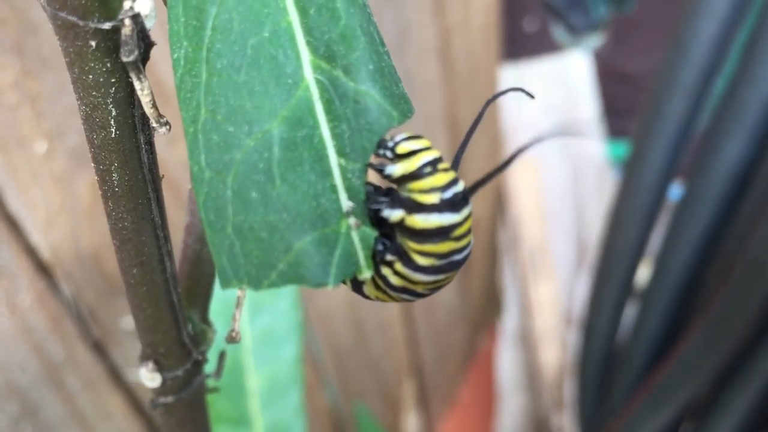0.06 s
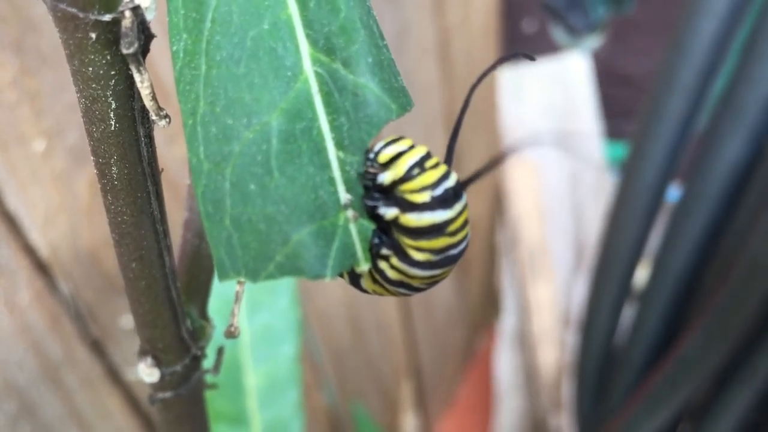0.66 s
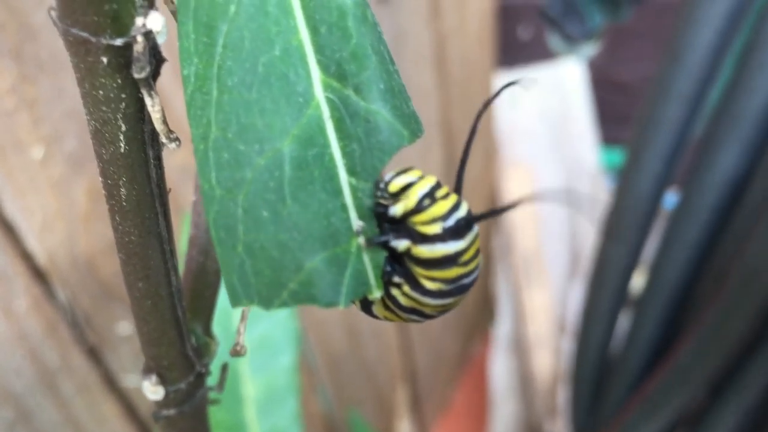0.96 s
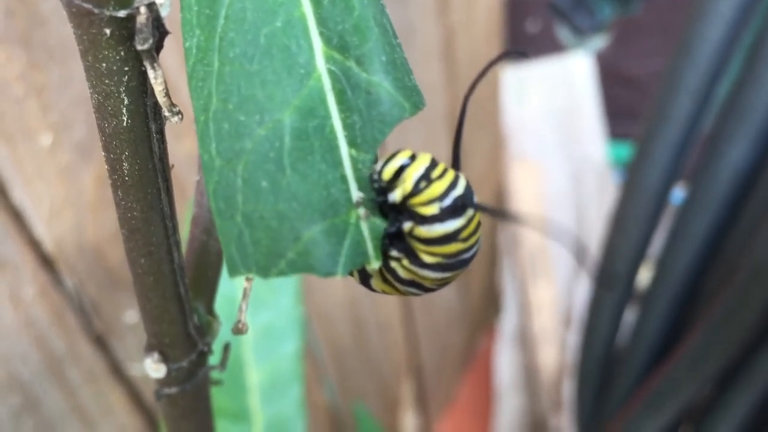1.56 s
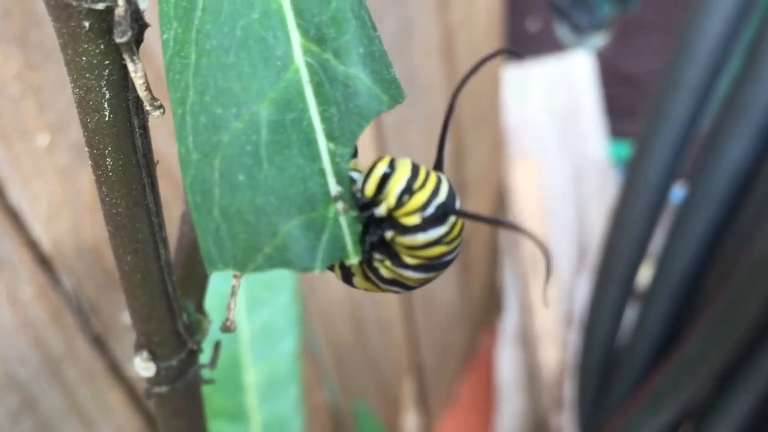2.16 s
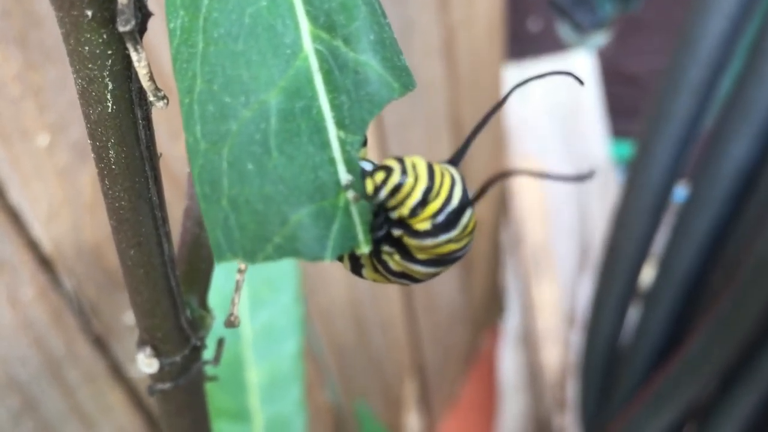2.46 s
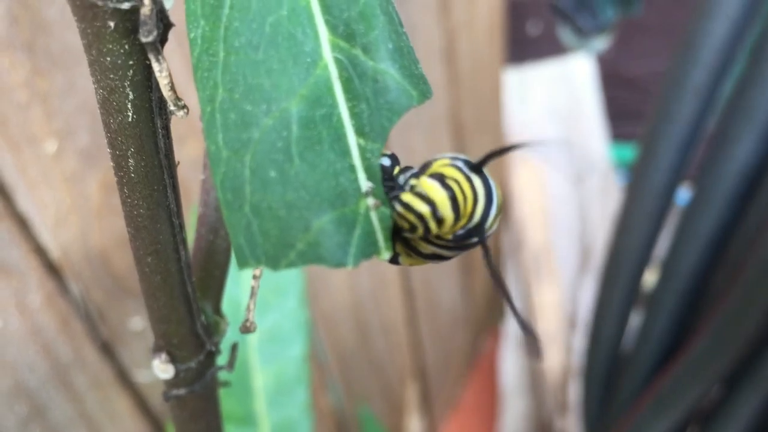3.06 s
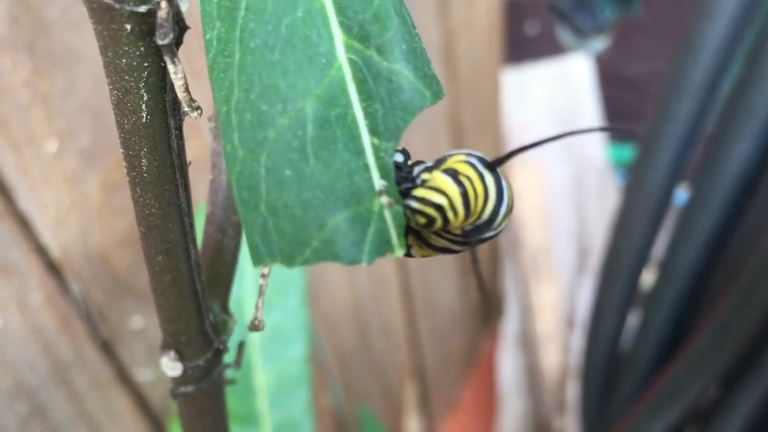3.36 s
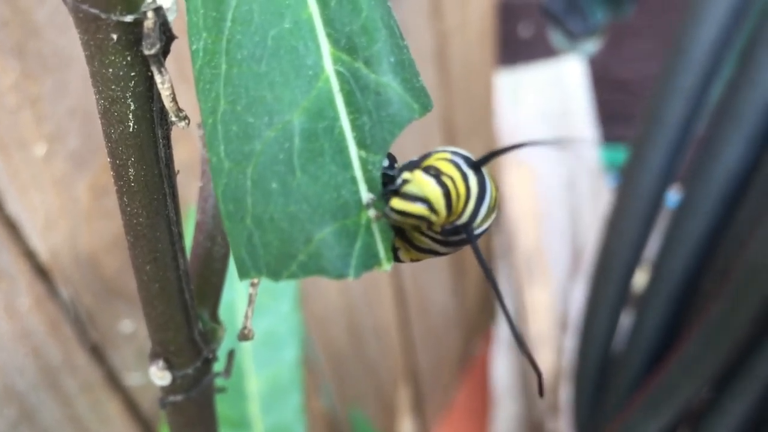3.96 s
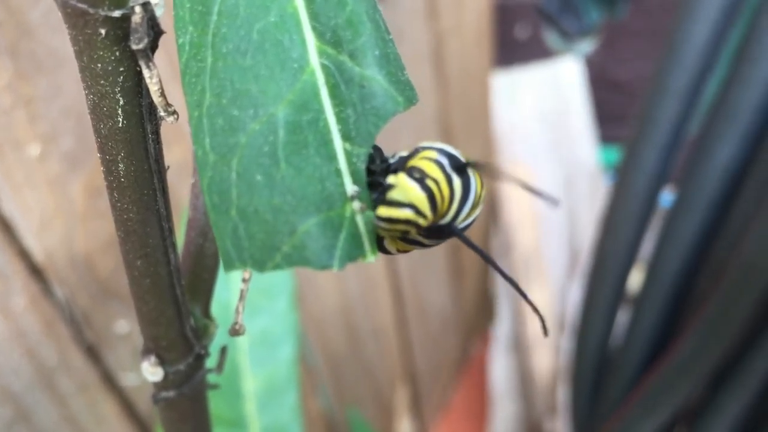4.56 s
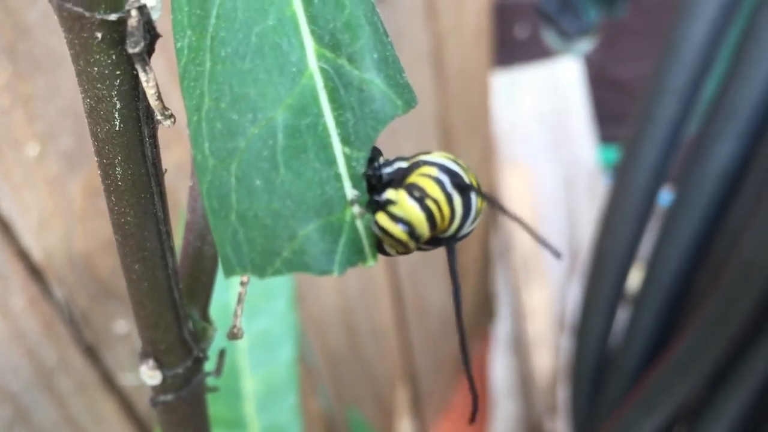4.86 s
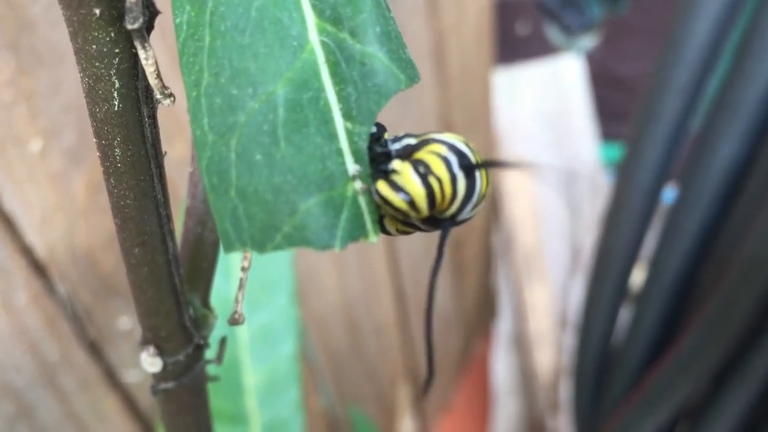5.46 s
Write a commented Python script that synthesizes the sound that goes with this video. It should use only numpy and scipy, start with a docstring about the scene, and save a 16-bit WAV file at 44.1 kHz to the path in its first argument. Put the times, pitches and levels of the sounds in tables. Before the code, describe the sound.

Distant traffic and a machine hum outdoors, with faint steady ticking, a tiny leaf crunch and one soft bump on the microphone.

```python
"""A back yard, a phone microphone held close to a caterpillar feeding on a leaf. From the start, far traffic
and an outdoor machine's hum lie behind tiny clock-steady ticks, most likely the phone's electronics.
About a second in, leaf fibres snap in a faint crunch and a few soft scuffs follow. Near 2.5 s the phone
takes one soft bump and the hand steadies it. Meanwhile a distant car pulls away, its exhaust rising
with the revs, and changes gear near 5 s."""
import sys
import numpy as np
from scipy import signal
from scipy.fft import rfft, irfft
from scipy.io import wavfile

SR = 44100
rng = np.random.default_rng(int(sys.argv[2]) if len(sys.argv) > 2 else 0)


def put_to_file(sound):
    """Save the sound as 16-bit audio at rate SR, in the file named by the first command-line argument."""
    columns = np.atleast_2d(sound).T  # one column per channel
    safe = np.clip(columns, -1, 1)
    whole_steps = np.round(safe * 32767)
    wavfile.write(sys.argv[1], SR, whole_steps.astype(np.int16))


N = 247842
TIME = np.arange(N) / SR


def snap(at_s, peak_db, hz, t60_s=.0067, width_hz=3800):
    """One leaf fibre gives way in a burst of a few milliseconds."""
    age = TIME[:SR // 20]
    burst = rng.standard_normal(len(age)) * np.exp(-np.log(1000) * age / t60_s)
    burst = band(burst, hz, width_hz)
    out, start = np.zeros(N), round(at_s * SR)
    out[start:start + len(age)] = from_db(peak_db) * burst / np.abs(burst).max()
    return out


def crunch(bite_s=.9708, peak_db=-49, bite_hz=8600, fibre_hz=5800, gap_s=.0026, loss_db=2):
    """The bite, close up: one fibre cracks, the leaf breaks brightly, and six more follow in a dying run."""
    out = snap(bite_s - .0108, peak_db - 6, fibre_hz) + snap(bite_s, peak_db, bite_hz)
    for k, (late, pitch) in enumerate(rng.uniform(-.82, 1, (6, 2))):
        at_s = bite_s + gap_s * (k + 1 + .3 * late)
        out += snap(at_s, peak_db - loss_db * k, fibre_hz * 2 ** (.2 * pitch))
    return out


# Rubs of leaf and stem, close to the microphone; levels are rms at the top of each swell:
# (time [s], body level [dB], body centre [Hz], body width [Hz], half length [s], rasp level [dB])
LEAF_RUBS = [(.979, -57.5, 2150, 900, .014, -66), (1.408, -47.5, 1660, 360, .018, -64),
             (2.526, -62, 2620, 400, .012, -80), (2.817, -61.5, 2860, 380, .017, -67.5)]

def scuffs(grain_db=2, rasp_hz=3900, rasp_width_hz=1300):
    """Short grainy rubs swell and fade, each with a body of its own pitch and a higher rasp."""
    out, grain = np.zeros(N), from_db(grain_db * drift(250))
    for at_s, body_db, hz, width_hz, half_s, rasp_db in LEAF_RUBS:
        rub = rng.standard_normal(N) * grain
        body = from_db(body_db) * rms_one(band(rub, hz, width_hz))
        rasp = from_db(rasp_db) * rms_one(band(rub, rasp_hz, rasp_width_hz))
        out += (body + rasp) * swell(at_s, half_s)
    return out


# The tapped case of the phone, heard by its own microphone: (frequency [Hz], relative level [dB])
CASE_SPECTRUM = [(300, -15), (900, 3), (1400, 3.5), (2100, -12.5), (2900, -7), (3300, -19), (3800, -19),
                 (4400, -38), (6000, -29), (10000, -52)]

def bump(at_s=2.4472, low_hz=62, glide_hz=370, glide_s=.0024, rise_s=.0014, length_s=.032, ring_t60_s=.066):
    """A light tap rings briefly in the phone's case, with a thud whose pitch sinks at once into the bass."""
    age = np.maximum(TIME - at_s, 0)
    cycles = low_hz * age + glide_hz * glide_s * (1 - np.exp(-age / glide_s))
    envelope = (1 - np.exp(-age / rise_s)) * np.exp(-(age / length_s) ** 4)
    thud = np.sin(2 * np.pi * cycles) * envelope
    touch = signal.unit_impulse(N, round((at_s - .00091) * SR))   # just ahead of the thud
    tap = colour(touch, CASE_SPECTRUM)
    ring = noise(CASE_SPECTRUM) * (age > 0) * np.exp(-np.log(1000) * age / ring_t60_s)
    return from_db(-17.5) * thud + from_db(-27) * tap / np.abs(tap).max() + from_db(-52) * ring


def handling(level_db=-41):
    """A faint low shudder as the hand steadies the phone after the bump."""
    shake = band(rng.standard_normal(N), hz=58, width_hz=25)
    return from_db(level_db) * rms_one(shake) * swell(at_s=2.7, half_s=.14)


# The thin, bright colour of the ticks at the microphone: (frequency [Hz], relative level [dB])
TICK_SPECTRUM = [(1500, -13.5), (3000, -8), (4200, -17), (4750, 0.5), (5250, 3.5), (5700, -2.5),
                 (6300, 2.5), (7100, -6), (7700, -5), (9600, -14), (10400, -29), (12000, -11), (14300, -24),
                 (15300, -18.5)]
# The ticks grow a little weaker midway: (time [s], relative level [dB])
TICK_TREND = [(0, -0.5), (1, 1), (2.1, -0.7), (3.3, -1), (4.3, 0.8), (5.62, -0.5)]

def ticks(fast_period_s=.1024, slow_period_s=.3, fast_db=-50.5, slow_db=-47, busy_s=.057, early_s=.005):
    """Two steady clocks of sharp impulses; the fast one makes way for the slow one, giving close pairs."""
    slow = np.arange(.228, TIME[-1], slow_period_s)
    fast = np.arange(.0318, TIME[-1], fast_period_s)
    # a fast tick due within busy_s after a slow one comes just ahead of it instead, 2 dB stronger
    since_slow = (fast - slow[0] + early_s) % slow_period_s - early_s
    paired = since_slow < busy_s
    fast = np.where(paired, fast - since_slow - early_s, fast)
    clicks = np.zeros(N)
    for times, db in ((fast, fast_db + 2 * paired), (slow, slow_db)):
        spread_db = .8 * rng.standard_normal(len(times))
        clicks[np.round(times * SR).astype(int)] = from_db(db + spread_db)
    unit_peak = np.abs(colour(signal.unit_impulse(N), TICK_SPECTRUM)).max()
    return colour(clicks * from_db(in_time(TICK_TREND)), TICK_SPECTRUM) / unit_peak


# Engine speed of the car, far from the yard: (time [s], engine cycle rate [Hz])
ENGINE_SPEED = [(0, 15), (1.6, 16.3), (2.6, 18.5), (3.1, 22.5), (3.6, 25.2), (4.05, 28.7), (4.6, 32.5),
                (4.74, 31.2), (4.95, 26), (5.17, 28.4), (5.62, 29.3)]
# Its tones: (multiple of the cycle rate [-], level in lower gear [dB], level in higher gear [dB])
ORDER_BALANCE = [(2, -16, -9), (2.5, -10.5, 1), (3, 0.5, -2), (3.5, -12.5, -1), (4, -2, -4.5),
                 (5, -10, -2.5), (6, 0, -3), (7, -7.5, -6.5), (8, -13, 1.5), (10, -6, -15)]
# Resonances of its exhaust pipe: (frequency [Hz], gain [dB])
EXHAUST_PIPE = [(35, -19), (55, -5.5), (75, -4.5), (92, -0.5), (125, -2.5), (145, -6.5), (175, -0.5),
                (195, -6.5), (215, -8), (238, -5.5), (265, -8), (310, -9), (400, -19)]

def car(cruise_hz=14.9, cruise_db=-52.3, db_per_octave=13.5, ease_s=4.72, ease_db=4.8, gear_change_s=4.95):
    """Engine orders sweep through the exhaust resonances over a rough roar; both grow with the revs."""
    revs = in_time(ENGINE_SPEED)
    phase = 2 * np.pi * np.cumsum(revs * (1 + .0085 * drift(12.14))) / SR
    eased = .5 + .5 * np.tanh((TIME - ease_s) / .2)   # the driver eases off
    shifted = .5 + .5 * np.tanh((TIME - gear_change_s) / .096)   # the new load favours other orders
    level_db = cruise_db + db_per_octave * np.log2(revs / cruise_hz) - ease_db * eased
    out = from_db(level_db - 2.5) * rumble()
    for multiple, low_gear_db, high_gear_db in ORDER_BALANCE:
        order_db = low_gear_db + shifted * (high_gear_db - low_gear_db)
        pipe_db = at_hz(EXHAUST_PIPE, multiple * revs)
        flutter_db = 3 * drift(7.7)
        out += tone(multiple * phase + 2 * np.pi * rng.random(), level_db + order_db + pipe_db + flutter_db)
    return out


# An outdoor machine in the background: (frequency [Hz], rms level [dB])
MACHINE_TONES = [(120, -47.2), (346.8, -54), (405.9, -62), (567.6, -59), (693.8, -60.5)]

def machine_hum(waver_db=1.6, wander_rad=.22):
    """A running machine holds steady tones that waver a little in level and phase."""
    out = np.zeros(N)
    for hz, db in MACHINE_TONES:
        level_db = db + waver_db * drift(3.6)
        phase = 2 * np.pi * (hz * TIME + rng.random()) + wander_rad * drift(3.7)
        out += tone(phase, level_db)
    return out


# The low end of far vehicles as it reaches the yard: (frequency [Hz], relative level [dB])
RUMBLE_SPECTRUM = [(15, -58), (32, -14), (45, -4.5), (60, -1.5), (85, 6), (105, 2.5), (140, -3.5),
                   (200, -2), (235, -1), (280, -5.5), (340, -7.5), (450, -43.5), (2000, -80.5)]

def rumble():
    """The low, rough noise of distant vehicles, at unit rms."""
    return noise(RUMBLE_SPECTRUM)


# The roar of tyres from far off: (frequency [Hz], relative level [dB])
TYRE_SPECTRUM = [(200, -13.5), (320, -7), (370, -3), (430, 2.5), (510, -3.5), (640, 2.5), (780, 0),
                 (850, -2), (1020, 4), (1150, 0.5), (1300, -7.5), (1550, -7.5), (1800, -16.5),
                 (2100, -23.5), (3000, -38), (8000, -73.5)]
# Far vehicles going by: (time [s], half length [s], top rms level [dB], centre [Hz], width [Hz])
PASSING_VEHICLES = [(1.16, 0.35, -46.5, 920, 260), (2.4, .3, -51, 1000, 300),
                    (3.514, 0.44, -48.3, 1430, 650)]

def traffic(rumble_db=-46, tyres_db=-46, waver_db=.5):
    """Steady rumble and tyre roar, out of which single vehicles swell and fade."""
    out = from_db(rumble_db) * rumble()
    out += from_db(tyres_db + waver_db * drift(1.9)) * noise(TYRE_SPECTRUM)
    for at_s, half_s, db, hz, width_hz in PASSING_VEHICLES:
        tyres = rms_one(resonance(noise(TYRE_SPECTRUM), hz, width_hz))
        out += from_db(db) * tyres * swell(at_s, half_s)
    return out


# The noise floor of the phone's microphone: (frequency [Hz], relative level [dB])
HISS_SPECTRUM = [(1500, 1), (3000, 0), (4600, -2), (5400, -0.5), (6400, -1.5), (7200, -8), (8600, -5.5),
                 (9700, -8), (10400, -13.5), (11600, -10), (13500, -12), (15800, -13)]

def microphone_hiss(hiss_db=-70, whine_hz=4040, whine_db=-90):
    """The microphone's steady hiss, with a thin, very faint whine in it."""
    return from_db(hiss_db) * noise(HISS_SPECTRUM) + tone(2 * np.pi * whine_hz * TIME, whine_db)


def from_db(db):
    """Decibels to gain."""
    return 10 ** (np.asarray(db) / 20)


def rms_one(x):
    """Scale to unit rms."""
    return x / np.sqrt(np.mean(x ** 2) + 1e-20)


def tone(phase, rms_db):
    """A sine of the given phase and rms level."""
    return np.sqrt(2) * from_db(rms_db) * np.sin(phase)


def swell(at_s, half_s):
    """A bell-shaped rise and fall around a moment."""
    return np.exp(-((TIME - at_s) / half_s) ** 2)


def in_time(curve):
    """Read a (time, value) curve at every sample."""
    return np.interp(TIME, *np.transpose(curve))


def at_hz(spectrum, hz):
    """Read a spectrum's decibels on a log-frequency axis."""
    known_hz, db = np.transpose(spectrum)
    return np.interp(np.log(np.maximum(hz, 1)), np.log(known_hz), db)


def colour(x, spectrum, size=2 ** 18):
    """Causal (minimum-phase) filter with the given spectrum."""
    bin_hz = np.arange(size // 2 + 1) * SR / size
    cepstrum = irfft(np.log(from_db(at_hz(spectrum, bin_hz))))
    cepstrum[1:size // 2] *= 2
    cepstrum[size // 2 + 1:] = 0
    return irfft(rfft(x, size) * np.exp(rfft(cepstrum)))[:N]


def noise(spectrum):
    """Coloured noise of unit rms."""
    return rms_one(colour(rng.standard_normal(N), spectrum))


def drift(rate_hz, step=40, settle=2000):
    """A smooth random wander of unit rms, mostly slower than rate_hz."""
    pole = np.exp(-2 * np.pi * rate_hz * step / SR)
    white = rng.standard_normal(N // step + settle + 2)
    slow = signal.lfilter([1], [1, -2 * pole, pole ** 2], white)[settle:]
    return np.interp(np.arange(N) / step, np.arange(len(slow)), rms_one(slow))


def resonance(x, hz, width_hz):
    """Two-pole resonance with gain 1 at its peak."""
    radius = np.exp(-np.pi * width_hz / SR)
    feedforward = np.array([1, 0, -1]) * (1 - radius ** 2) / 2
    feedback = [1, -2 * radius * np.cos(2 * np.pi * hz / SR), radius ** 2]
    return signal.lfilter(feedforward, feedback, x + 1e-18)


def band(x, hz, width_hz):
    """The same resonance twice, for steeper sides."""
    return resonance(resonance(x, hz, width_hz), hz, width_hz)


def scene():
    """Small sounds at the microphone over the far background of the yard, in mono."""
    close = ticks() + crunch() + scuffs() + bump() + handling()
    far = car() + machine_hum() + traffic()
    return (close + far + microphone_hiss())[None]


def record(dry, cutoff_hz=15750):
    """The top of the treble is cut steeply."""
    return signal.sosfilt(signal.ellip(12, .1, 80, cutoff_hz, fs=SR, output="sos"), dry)


dry = scene()
out = record(dry)
put_to_file(out)
```